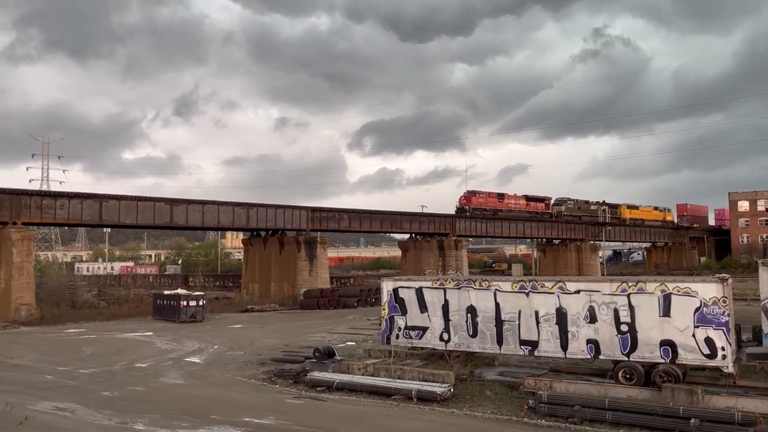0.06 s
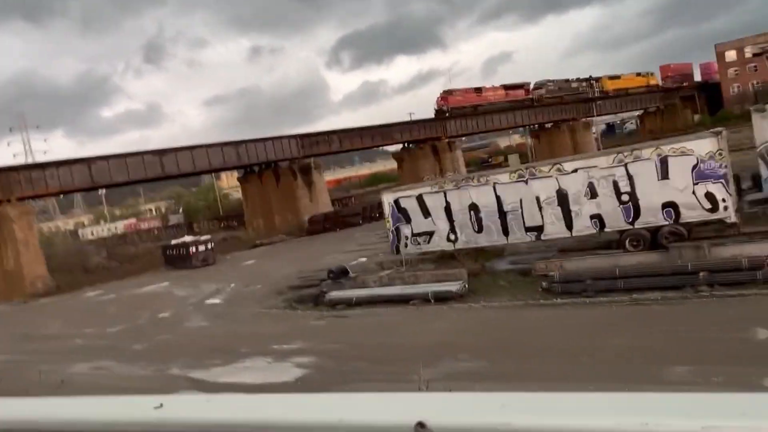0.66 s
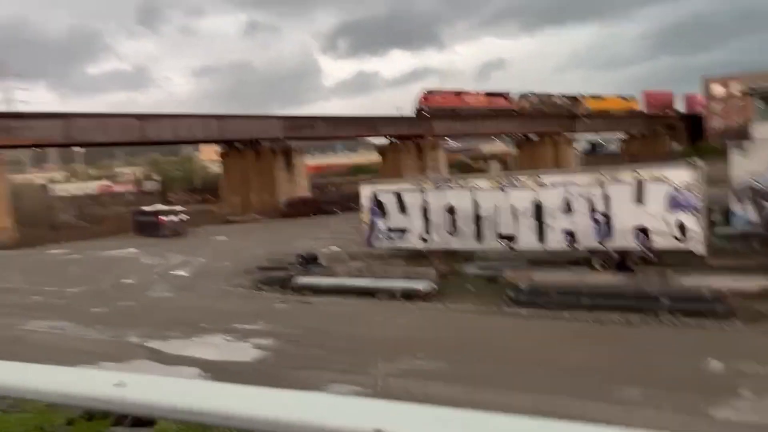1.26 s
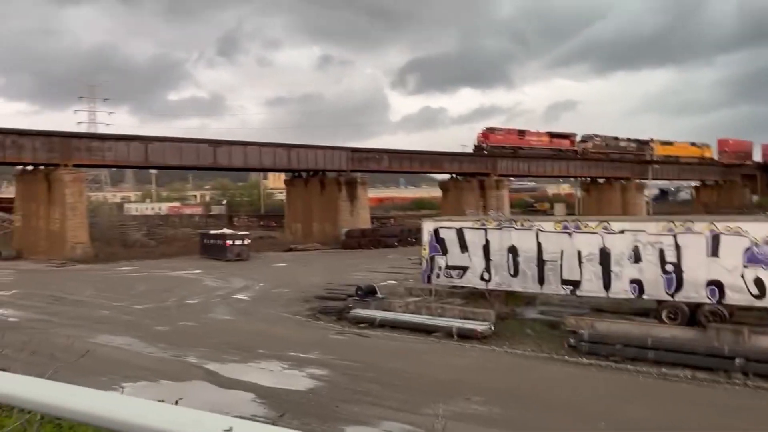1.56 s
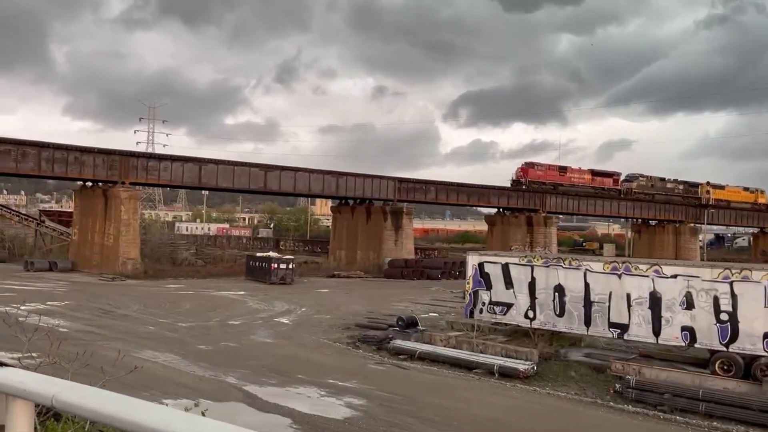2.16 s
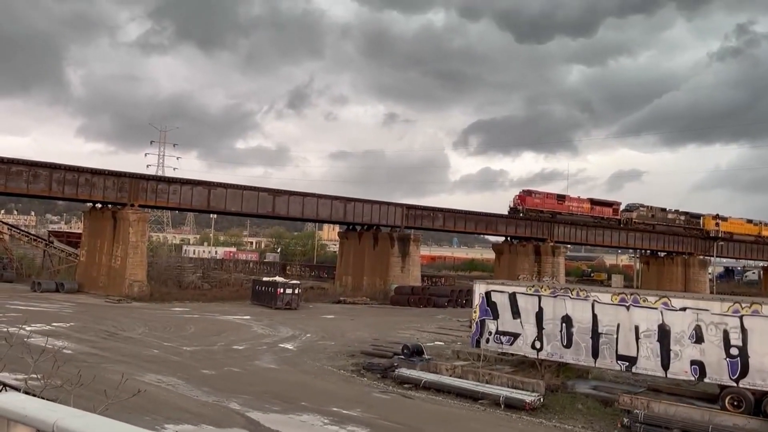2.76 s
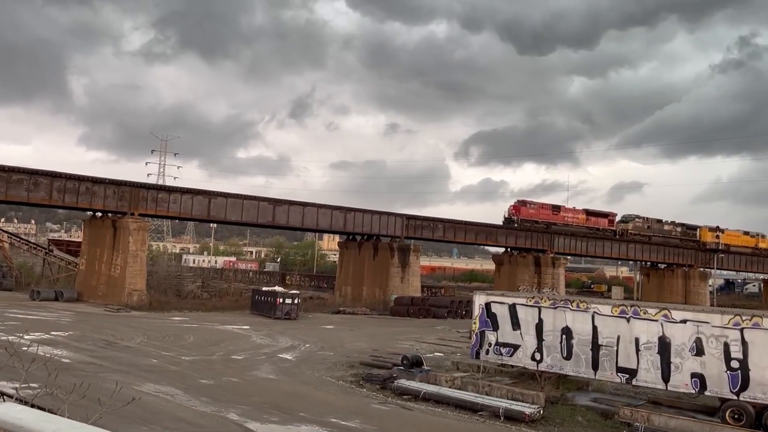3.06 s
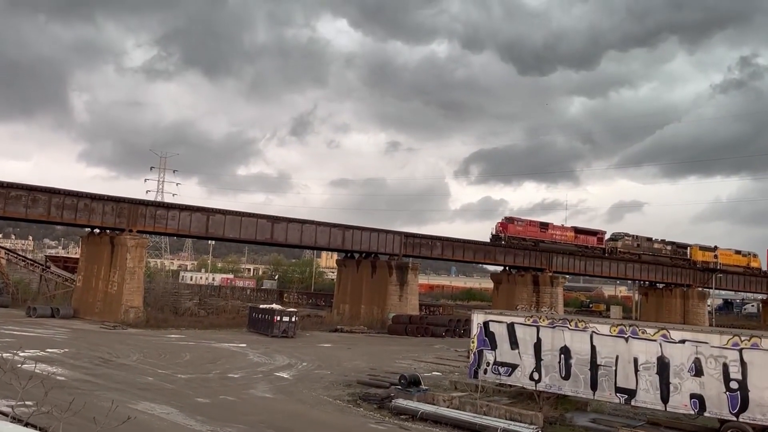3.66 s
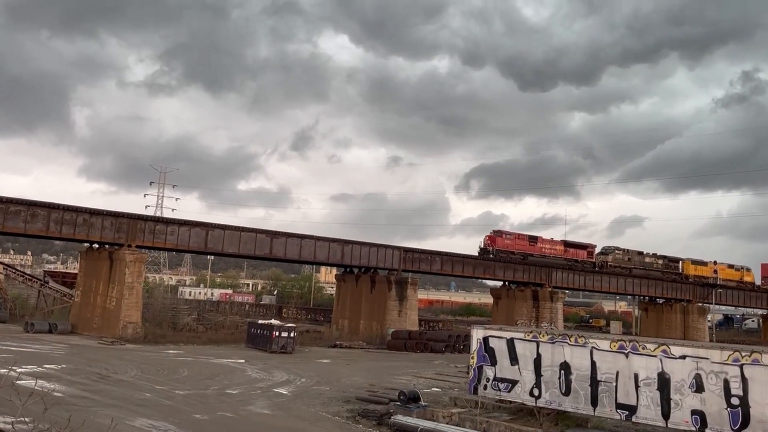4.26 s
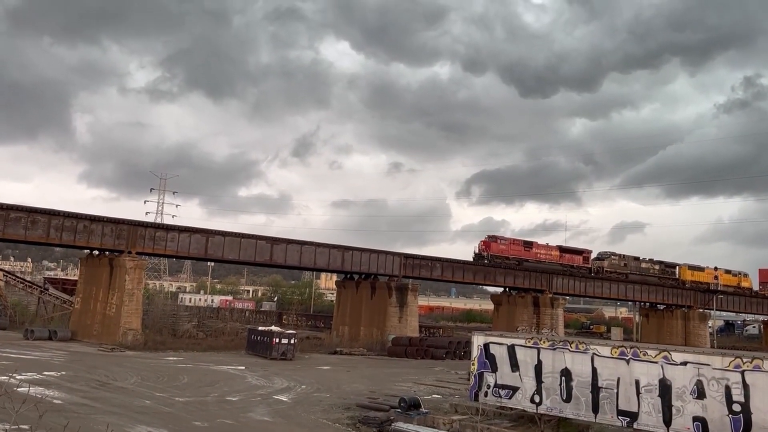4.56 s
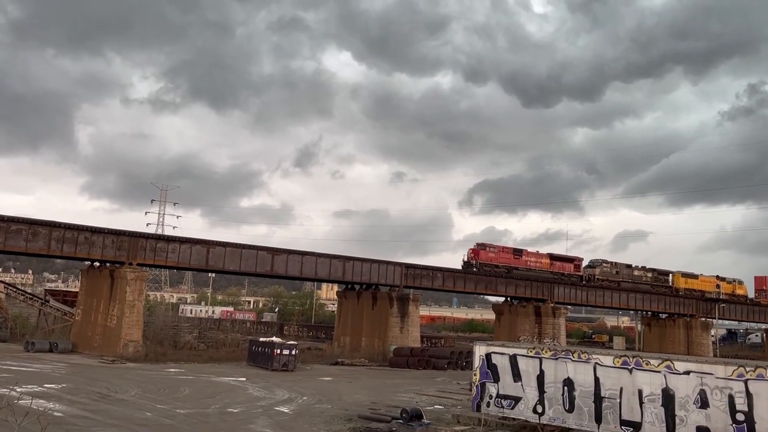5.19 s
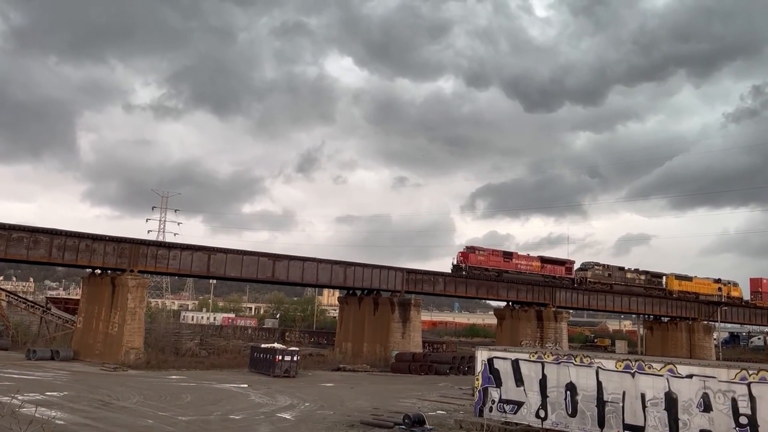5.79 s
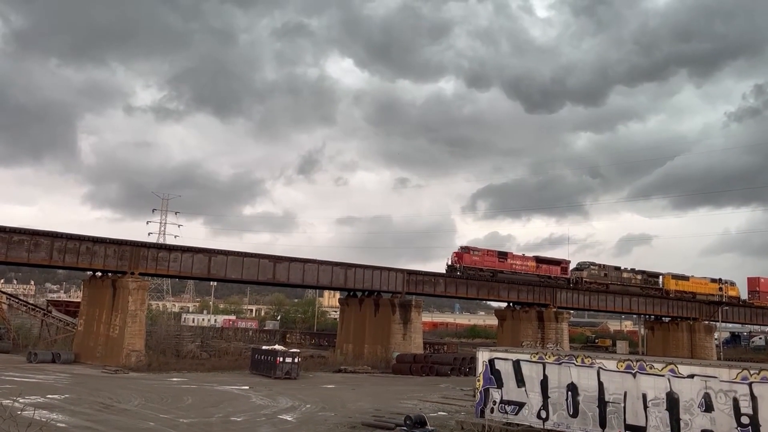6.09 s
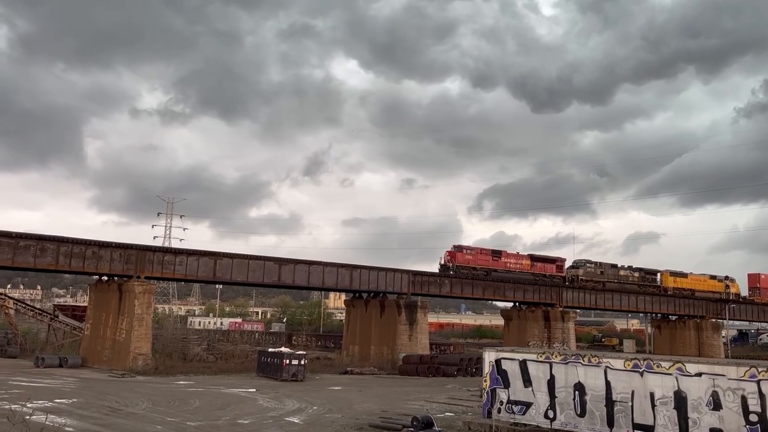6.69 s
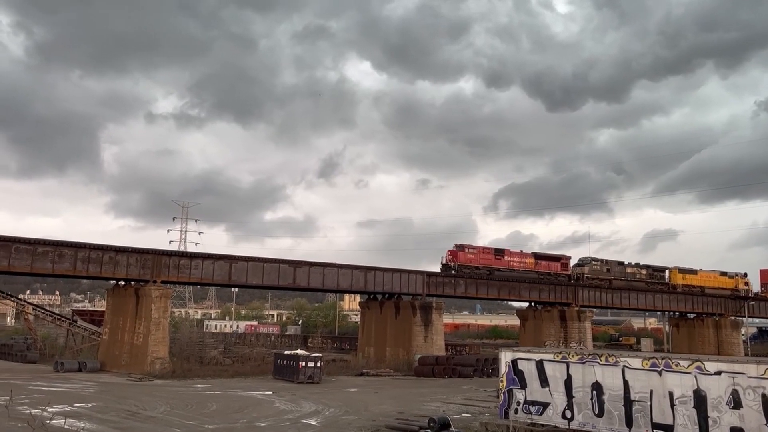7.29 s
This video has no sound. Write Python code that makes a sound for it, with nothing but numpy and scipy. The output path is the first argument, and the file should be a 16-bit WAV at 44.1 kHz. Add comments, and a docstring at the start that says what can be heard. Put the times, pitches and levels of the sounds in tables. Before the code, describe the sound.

A diesel freight train rolls slowly over a steel bridge across an open yard, its engines throbbing low under a steady wheel roar with faint thin squeals. It grows slightly louder. From about two seconds in, ragged gusts of wind buffet and thump the microphone. Close by, a camera shutter fires three bursts of three sharp clicks, each with a tiny motor whir, the last burst near the end.

```python
"""Diesel engines throb and wheels roar as a freight train rolls slowly over a steel girder bridge. Across an
open yard, the exhaust tones of its two locomotives beat together; rolling contact sets wheels, rails and
girders ringing, and friction makes the flanges sing thinly. Turbulent gusts buffet the microphone in ragged
bursts. Close by, a reflex camera fires three bursts of three frames: mirror and curtain strike its body, a
spring rings and the motor whines."""
import sys
import numpy as np
from scipy import signal
from scipy.fft import rfft, irfft, next_fast_len
from scipy.io import wavfile
from scipy.ndimage import uniform_filter1d

SR = 44100
rng = np.random.default_rng(int(sys.argv[2]) if len(sys.argv) > 2 else 0)


def materialize(psi):
    """Save the field psi as 16-bit PCM at rate SR to the path in sys.argv[1].

    A 1-D psi becomes a single channel; in a 2-D psi each row is a channel.
    """
    bounded = np.clip(np.atleast_2d(psi).T, -1, 1)
    quanta = np.round(bounded * 32767).astype(np.int16)
    wavfile.write(sys.argv[1], SR, quanta)


N = 328104
TIME = np.arange(N) / SR

# The train draws nearer. Each row: time in seconds, roar in dB, hiss in dB.
TRAIN_LEVELS = [(0.0, -43.5, -49.5), (0.45, -42.5, -50.5), (0.85, -41.5, -49), (1.3, -40.5, -48),
                (1.88, -39.5, -43.5), (2.9, -40.5, -44.5), (3.1, -37.5, -44), (3.58, -37.5, -44),
                (4.3, -39, -44), (6.38, -38, -41.5), (6.85, -37, -38), (7.44, -37.5, -42.5)]
# Buffets of wind. Each row: time of the peak in seconds, rush in dB, thump in dB, width in seconds.
WIND_BUFFETS = [(0.035, -35, -22, 0.02), (0.201, -31, -27, 0.0058), (0.848, -33, -29, .009),
                (0.865, -31, -34, 0.032), (1.236, -35.5, -30, 0.0064), (1.26, -35, -25, 0.0097),
                (1.348, -25.5, -29, 0.018), (1.62, -36, -29, 0.015), (1.974, -29.5, -33, 0.018),
                (2.1, -29.5, -30, 0.025), (2.277, -42, -21, 0.037), (2.407, -21, -34, 0.03),
                (2.439, -25, -19, 0.007), (2.557, -22.5, -20, 0.014), (2.683, -30, -16, 0.0066),
                (2.772, -33.5, -27, 0.0024), (2.884, -35, -22.5, 0.01), (3.108, -29, -18, 0.0087),
                (3.171, -25.5, -27, 0.017), (3.346, -24.5, -30, 0.011), (3.38, -34, -18.5, 0.011),
                (3.48, -22.5, -22, 0.011), (3.485, -27, -22, .01), (3.564, -23.5, -18, 0.0093),
                (3.622, -21.5, -22, 0.014), (3.66, -23.5, -41, 0.014), (3.749, -23.5, -35, 0.017),
                (3.797, -27.5, -20, 0.0079), (3.887, -22.5, -22, 0.013), (3.929, -24.5, -24, 0.018),
                (3.959, -22, -32, 0.008), (3.978, -29, -18.5, .01), (4.05, -42, -27, 0.012),
                (4.262, -27.5, -26, 0.0062), (4.346, -27.5, -23, 0.0076), (4.713, -26, -25, 0.015),
                (4.839, -27.5, -26, 0.019), (4.913, -35, -18.5, 0.0086), (5.007, -27, -17, 0.0085),
                (5.045, -24, -28, 0.012), (5.073, -24, -22, 0.0061), (5.185, -25.5, -19, 0.0071),
                (5.272, -28, -16, 0.011), (5.34, -28.5, -16, 0.0052), (5.414, -29.5, -23.5, 0.026),
                (5.577, -27, -21.5, 0.021), (5.702, -30, -21, 0.012), (5.888, -36, -18.5, 0.005),
                (6.396, -25, -24, 0.012), (6.505, -41, -20, 0.028), (6.564, -27.5, -23, 0.028),
                (6.677, -29.5, -24, 0.028), (6.855, -26.5, -38, 0.016), (7.049, -22, -17, 0.013),
                (7.067, -39, -18, 0.0065), (7.171, -17.5, -17, 0.02), (7.227, -26.5, -19, 0.006),
                (7.33, -28.5, -14, 0.0072), (7.362, -36.5, -16, 0.014)]
# Likeness of the wind's two channels. Each row: frequency in Hz, correlation from -1 to 1.
WIND_CORRELATION = [(50, 0.69), (90, 0.93), (150, 0.58), (400, 0.73), (1000, 0.38)]
# Balance of the wind. Each row: frequency in Hz, left over right in dB.
WIND_PAN = [(60, 0.3), (600, -2)]
# Camera modes excited by the mirror. Each row: frequency in Hz, bandwidth in Hz, gain in dB.
BODY_MODES = [(1960, 570, 5), (3064, 260, 8), (3740, 470, 4.5), (5090, 530, 9.5), (6200, 650, 4.5),
              (7060, 480, 1.5), (8430, 700, 0)]


def rolling_noise(roar_db=7.5, hiss_db=2.0, girder_db=0.5, ring_db=-1.2, waver_db=1.12):
    """Forced vibration: girders roar, wheels and rails hiss, and the air makes both waver; modes ring."""
    # In both spectra, each row: frequency in Hz, spectral density in dB.
    roar_spectrum = [(40, 6.5), (70, 9), (140, 8), (220, -14), (380, -1.5), (700, 1.5), (1000, 2.5),
                     (1400, 5), (1900, -1.5), (2500, -10), (3300, -41), (6000, -64)]
    hiss_spectrum = [(1200, -7.5), (2400, 9.5), (3100, 8.5), (3600, 3), (4400, 2.5), (5300, -1),
                     (6200, -1.5), (7000, -3.5), (8000, -9), (8800, -18.5), (9700, -71), (10500, -33),
                     (11400, -17.5), (13200, -29), (14800, -49)]
    # Each row: frequency in Hz, correlation of the channels.
    correlation = [(60, 0.94), (250, 0.99), (550, -0.015), (880, 0.037), (1350, -0.74), (1750, -0.37),
                   (2250, 0.23), (3200, 0.11), (3500, -0.071), (4100, 0.4), (5100, 0.84), (5650, -0.23),
                   (6450, -0.49), (6900, 0.5), (7900, 0.57), (8700, -0.29)]
    # Each row: frequency in Hz, left over right in dB.
    balance = [(800, 2), (1300, 3), (1800, 4.5), (2600, 2.5), (3800, -7.5), (5500, 0), (7500, 0.5)]
    # In both sets, each row: frequency in Hz, bandwidth in Hz, gain in dB, left over right in dB.
    girder_modes = [(967, 88, -9, -4), (1128, 78, -20.5, 1), (1327, 64, -11.5, 0), (1521, 116, -11, 4),
                    (1867, 99, -16, 4), (2044, 150, -11.5, 1.5)]
    wheel_modes = [(3218, 310, -8.5, 7), (3950, 420, -10.5, -10.5), (4700, 97, -8, -4.5),
                   (5225, 340, -12, -5.5)]
    roar, hiss = in_time(TRAIN_LEVELS)
    out = from_db(roar + roar_db + waver_db * drift(3.6)) * noise(roar_spectrum, correlation, balance)
    out += from_db(hiss + hiss_db + waver_db * drift(29)) * noise(hiss_spectrum, correlation, balance)
    out += from_db(roar + girder_db) * steel_ringing(girder_modes, flicker_db=4.0, alike=-0.5)
    return out + from_db(hiss + ring_db) * steel_ringing(wheel_modes, flicker_db=2.5, alike=0.18)


def steel_ringing(modes, flicker_db, alike):
    """Modal superposition: rubbed steel rings in modes that fade in and out independently."""
    return sum(from_db(db + flicker_db * drift(19.0)) * rubbed_mode(hz, width_hz, alike) * pan(pan_db)
               for hz, width_hz, db, pan_db in modes)


def rubbed_mode(hz, width_hz, alike):
    """Resonance narrows random friction to a restless stereo tone of unit rms."""
    mid, side = rng.standard_normal((2, N))
    rub = np.sqrt(1 + alike) * mid + np.sqrt(1 - alike) * side * [[1], [-1]]
    return rms_one(resonate(resonate(rub, hz, width_hz), hz, width_hz))


def engine_rumble(cycles_per_s=6.5, throb_db=3.0, wander=0.0097, air_db=-1.0):
    """Beats: exhaust tones of engines at unequal speeds throb over deep noise that thumps in buffets."""
    # Engines and moving air. Each row: time in seconds, level in dB.
    rumble_levels = [(0.0, -29.5), (0.33, -37), (0.88, -30), (2.2, -41), (2.28, -26), (2.96, -28.5),
                     (3.42, -21), (4.65, -33), (5.08, -25.5), (6.86, -25), (7.09, -22), (7.44, -31.5)]
    # Each row: frequency in Hz, level in dB relative to the rumble.
    exhaust_tones = [(66, -2), (68.3, -6.5), (72.5, -10), (86, -7)]
    # Each row: frequency in Hz, spectral density in dB.
    deep_spectrum = [(18, -28), (30, -14), (40, -19), (50, -0.5), (66, -5), (85, -2), (120, -8.5),
                     (170, -13.5), (280, -23.5), (450, -37)]
    level = in_time(rumble_levels)[0] - 1.47
    thumps = [(s, thump_db, width_s) for s, _, thump_db, width_s in WIND_BUFFETS]
    air = evened(noise(deep_spectrum, WIND_CORRELATION, WIND_PAN), window_s=0.032)
    out = with_swells(level + air_db, thumps) * air
    throb = throb_db * wandering_sine(cycles_per_s, wander, rate=2)   # one swell per engine cycle
    for hz, db in exhaust_tones:
        tone = wandering_sine(hz, wander, rate=2.24)
        out += from_db(level + db + throb + drift(3.9)) * tone
    return out


def flange_squeal(rub_db=-12.5, waver_db=1.94):
    """Friction drives a high wheel mode, which sings out when the flange leans on the rail."""
    # Each row: time of the peak in seconds, level in dB, width in seconds.
    squeals = [(1.0, -57.5, .35), (1.96, -50, 0.095), (2.35, -49.5, 0.12), (4.35, -51, 0.045),
               (5.53, -46, 0.089), (5.878, -44, 0.14), (6.6, -50.5, 0.45), (7.35, -50.5, 0.15)]
    _, hiss = in_time(TRAIN_LEVELS)
    tone = rubbed_mode(hz=7270, width_hz=148, alike=0.87) * pan(2.4)
    return with_swells(hiss + rub_db, squeals) * from_db(waver_db * drift(14.0)) * tone


def wheel_squeaks(air_cut_hz=8200):
    """Sliding friction rings a wheel as it briefly slips; air absorption dulls the top."""
    # Each row: peak time in seconds, frequency in Hz, bandwidth in Hz, level in dB, width in seconds.
    slips = [(0.42, 1297, 70, -49, 0.18), (0.8, 1195, 80, -44.5, 0.26), (1.12, 1303, 80, -45, 0.35),
             (1.41, 2080, 150, -43, 0.066), (1.543, 4700, 3400, -48.5, 0.066),
             (1.817, 3850, 1490, -41, 0.011), (1.958, 4370, 1390, -42.5, 0.027),
             (1.97, 3200, 300, -45, 0.032), (4.277, 3140, 200, -43, 0.016), (4.633, 4300, 1100, -43, .022),
             (5.885, 2280, 480, -36, 0.033), (5.97, 3830, 900, -38, 0.016), (6.243, 4900, 200, -43, 0.017)]
    out = sum(from_db(db) * swell(s, width_s) * rubbed_mode(hz, width_hz, alike=0.25)
              for s, hz, width_hz, db, width_s in slips)
    return low_pass(out, air_cut_hz, order=6)


def camera():
    """Impact excitation: in each frame the mirror lifts, the curtain snaps, the mirror drops and bounces."""
    # Each row: time of the mirror's return in seconds, mirror and motor gain in dB, curtain gain in dB.
    frames = [(3.2888, -4, -3), (3.6041, -5, -4.5), (3.9203, -4, -1.5), (4.921, -3, -2), (5.2375, -3.5, -5),
              (5.5527, -3, -2.5), (6.559, -2.5, -1), (6.878, -2, -2), (7.1939, -1, 2.5)]
    # In both sets of contacts, each row: seconds from the return, level in dB, decay in seconds.
    mirror_hits = [(-.136, -27, 0.003), (-.126, -25, 0.0041), (-.1165, -22.5, 0.0033), (0, -13, .0027),
                   (.0115, -15.5, 0.0022), (.022, -29.5, .004)]
    curtain_hits = [(-.0508, -13.5, 0.0017)]
    # Each row: frequency in Hz, bandwidth in Hz, gain in dB.
    curtain_modes = [(3120, 450, -0.5), (4720, 270, 4), (5600, 500, 13), (6940, 450, -8)]
    t = np.arange(-SR // 5, SR // 8) / SR   # zero at the mirror's return
    out = np.zeros((2, N))
    for s, mirror_db, curtain_db in frames:
        mirror = impacts(mirror_hits, t) * camera_body(BODY_MODES, len(t), crisp_db=-16)
        curtain = impacts(curtain_hits, t) * camera_body(curtain_modes, len(t), crisp_db=-19)
        mechanism = mirror + spring(t) + motor(t)
        add(out, from_db(mirror_db) * mechanism + from_db(curtain_db) * curtain, s + t[0])
    return out * pan(-0.5)


def impacts(hits, t, tail_db=-22, tail_s=0.024, rise_s=0.00084):
    """Damping: the envelope of each contact decays exponentially, with a tail of rattling springs."""
    power = 0
    for s, db, decay_s in hits:
        age = np.maximum(t - s, 0)
        attack = 1 - np.exp(-age / rise_s)
        decay = np.exp(-age / decay_s) + from_db(tail_db) * np.exp(-age / tail_s)
        power += (from_db(db + rng.normal(0, 0.7)) * attack * decay) ** 2
    return np.sqrt(power)


def camera_body(modes, size, crisp_db, dull_hz=7600, crisp_hz=8500, alike=0.52):
    """Modal response: the body colours a rattle, with a bright crack on top; the level is held at 1."""
    shared, own = rng.standard_normal(size), rng.standard_normal((2, size))
    delayed_pair = np.array([shared, np.roll(shared, 12)])   # the sound reaches the left port first
    rattle = np.sqrt(alike) * delayed_pair + np.sqrt(1 - alike) * own
    # Every blow shares its strength among the modes a little differently.
    body = sum((-1) ** k * from_db(db + rng.normal(0, 1.0)) * resonate(rattle, hz, width_hz)
               for k, (hz, width_hz, db) in enumerate(modes))
    crack = from_db(crisp_db) * low_pass(rattle, crisp_hz, order=2)
    return evened(rms_one(low_pass(body, dull_hz, order=8) + crack), window_s=0.0028)


def motor(t, attack_s=0.0049, release_s=0.0029, gear_release_s=0.033, judder_hz=700, chatter_db=1.5):
    """Modulation: uneven gear load roughens a gliding whine; the gears rattle on after each run."""
    # Three runs: lift the mirror, lower it, rewind. Each row: start in seconds from the return, length
    # in seconds, first and target pitch in Hz, settling time in seconds, whine in dB, rasp in dB,
    # judder as a fraction of the pitch.
    runs = [(-.162, 0.035, 4320, 6830, 0.028, -41.5, -38, .05),
            (-.032, 0.029, 4810, 6160, 0.0047, -43, -38, .016),
            (0.013, 0.037, 4850, 4550, .03, -38, -40.5, .012)]
    out = 0
    for s, length_s, start_hz, end_hz, settle_s, whine_db, rasp_db, judder in runs:
        age = np.maximum(t - s, 0)
        attack = 1 - np.exp(-age / attack_s)
        stopped_s = np.maximum(age - length_s, 0)
        hz = end_hz + (start_hz - end_hz) * np.exp(-age / settle_s)
        load = rms_one(low_pass(rng.standard_normal(len(t)), judder_hz, order=2))
        speed = rng.normal(1, 0.0091) - judder * load
        tone = np.sqrt(2) * np.sin(2 * np.pi * np.cumsum(hz * speed) / SR)
        whine = from_db(whine_db + chatter_db * load + rng.normal(0, 0.97)) * tone
        gears = from_db(rasp_db) * camera_body(BODY_MODES[2:], len(t), crisp_db=-36)
        out += attack * (whine * np.exp(-stopped_s / release_s)
                         + gears * np.exp(-stopped_s / gear_release_s))
    return out


def spring(t, buzz_db=3.0, buzz_hz=250):
    """Free vibration: a spring rings down after the mirror lands, buzzing against its seat."""
    # Each row: frequency in Hz, level in dB, decay in seconds.
    modes = [(3070, -36.5, 0.034), (3250, -36, 0.033), (3696, -37, 0.01)]
    age = np.maximum(t, 0)
    buzz = from_db(buzz_db * rms_one(low_pass(rng.standard_normal(len(t)), buzz_hz, order=2)))
    ring = 0
    for hz, db, decay_s in modes:
        envelope = from_db(db + rng.normal(0, 1.2)) * np.exp(-age / decay_s)
        ring += envelope * np.sin(2 * np.pi * hz * rng.normal(1, 0.0049) * age)
    return buzz * ring


def wind(steady_db=-1.0, gain_db=0.5, lump_db=2.5, flutter_db=2.5, split_hz=400, brighten=0.37):
    """Turbulence reaches the microphone in lumps; its upper band flutters and grows in strong gusts."""
    # Each row: time in seconds, level in dB.
    wind_levels = [(0.0, -29.5), (.14, -47), (.51, -47), (.56, -37.5), (.9, -29.5), (1.07, -38),
                   (1.2, -33.5), (1.45, -41.5), (1.6, -37), (1.9, -36.5), (2.28, -24.5), (2.4, -27),
                   (2.48, -25.5), (2.92, -31.5), (3.02, -22.5), (3.28, -26), (3.38, -22), (3.6, -24.5),
                   (3.7, -28.5), (4.1, -29), (4.58, -34.5), (4.85, -31.5), (5.13, -33.5), (5.5, -29.5),
                   (5.85, -31.5), (6.65, -29), (6.98, -31), (7.12, -26), (7.28, -32), (7.44, -23.5)]
    # Each row: frequency in Hz, spectral density in dB.
    spectrum = [(60, -21.5), (120, 1.5), (180, 0.5), (280, -2), (480, -6.5), (700, -10), (1000, -18.5),
                (1500, -24), (3000, -76)]
    rushes = [(s, rush_db, width_s) for s, rush_db, _, width_s in WIND_BUFFETS]
    level = in_time(wind_levels)[0] + steady_db + lump_db * np.minimum(drift(43.5), 1.5)
    gust_db = 20 * np.log10(with_swells(level, rushes))
    air = noise(spectrum, WIND_CORRELATION, WIND_PAN)
    low = low_pass(air, split_hz, order=1)
    treble_db = flutter_db * np.minimum(drift(110), 1.5) + brighten * (gust_db - gust_db.mean())
    high = (air - low) * from_db(treble_db)
    return from_db(gust_db + gain_db) * evened(low + high, window_s=0.026)


def eddies(gain_db=-3.0, rise_s=0.0021):
    """Pressure pulses: each hard eddy hits the microphone ports with a brief, dull knock."""
    # Each row: start in seconds, level in dB.
    arrivals = [(.835, -22), (1.115, -27), (1.34, -23), (1.62, -28), (2.189, -25), (2.4, -19), (2.43, -15),
                (2.545, -14.5), (2.657, -19.5), (2.7, -17), (2.785, -15), (2.865, -23), (2.95, -24),
                (2.987, -18.5), (3.01, -14.5), (3.028, -12), (3.045, -13), (3.093, -20), (3.346, -13.5),
                (3.394, -18), (3.468, -17), (3.554, -13), (3.608, -15), (3.717, -18), (3.788, -18.5),
                (3.861, -20), (3.912, -13), (4.25, -25), (4.334, -21.5), (4.748, -22), (4.815, -24),
                (4.848, -23), (4.908, -26), (5.018, -17), (5.045, -15), (5.265, -16), (5.338, -21),
                (5.557, -27), (6.083, -17.5), (6.624, -22), (6.664, -16), (7.02, -21), (7.064, -17),
                (7.122, -16.5), (7.151, -9.5), (7.228, -21), (7.345, -13), (7.409, -23)]
    # Each row: frequency in Hz, spectral density in dB.
    spectrum = [(80, -8), (200, -5.5), (400, 2.5), (680, 0.5), (1000, -17.5), (2000, -52)]
    knocks = np.zeros(N)
    age_in_rises = np.arange(SR // 10) / SR / rise_s
    pulse = age_in_rises * np.exp(1 - age_in_rises)
    for s, db in arrivals:
        add(knocks, from_db(db + gain_db) * pulse, s)
    return knocks * evened(noise(spectrum, WIND_CORRELATION, WIND_PAN), window_s=0.0033)


def noise(spectrum, correlation, balance):
    """Spectral shaping: stereo noise of given colour, correlation and balance, at unit rms."""
    size = next_fast_len(N, True)
    hz = np.arange(size // 2 + 1) * SR / size
    mid, side = rfft(rng.standard_normal((2, size))) * from_db(at_hz(spectrum, hz))
    alike, ears = np.clip(at_hz(correlation, hz), -1, 1), np.array([[1], [-1]])
    roll_off = 1 / (1 + (hz / (2 * spectrum[-1][0])) ** 4)
    stereo = np.sqrt(1 + alike) * mid + np.sqrt(1 - alike) * side * ears
    return rms_one(irfft(roll_off * stereo * from_db(at_hz(balance, hz) * ears / 2), size)[:, :N])


def drift(rate):
    """Smooth random fluctuation of unit rms that changes about rate times a second."""
    step, run_in = 40, 2000
    pole = np.exp(-2 * np.pi * step * rate / SR)
    white = rng.standard_normal(N // step + run_in + 2)
    slow = signal.lfilter([1], [1, -2 * pole, pole * pole], white)[run_in:]
    return np.interp(np.arange(N) / step, np.arange(len(slow)), rms_one(slow))


def wandering_sine(hz, wander, rate):
    """Frequency modulation: a sine strays at random by the fraction wander."""
    phase = 2 * np.pi * np.cumsum(hz * (1 + wander * drift(rate))) / SR
    return np.sin(phase + rng.uniform(0, 2 * np.pi))


def swell(s, width_s):
    """Gaussian envelope of height 1 around time s."""
    return np.exp(-np.minimum(((TIME - s) / width_s) ** 2 / 2, 50))


def with_swells(steady_db, swells):
    """Incoherent addition: the gain of a steady level and its swells, summed in power."""
    swell_power = sum((from_db(db) * swell(s, width_s)) ** 2 for s, db, width_s in swells)
    return np.sqrt(from_db(steady_db) ** 2 + swell_power)


def evened(x, window_s):
    """Hold the short-term rms of a noise at 1."""
    size = int(window_s * SR)
    power = uniform_filter1d(uniform_filter1d(np.mean(x ** 2, axis=0), size), size)
    return x / np.sqrt(np.abs(power) + 1e-9)


def resonate(x, hz, width_hz):
    """Two-pole resonance with a peak gain of 1."""
    r = np.exp(-np.pi * width_hz / SR)
    feedback = [1, -2 * r * np.cos(2 * np.pi * hz / SR), r * r]
    return signal.lfilter(np.array([1, 0, -1]) * (1 - r * r) / 2, feedback, x)


def low_pass(x, hz, order):
    """Maximally flat low-pass."""
    return signal.sosfilt(signal.butter(order, hz, fs=SR, output="sos"), x)


def in_time(rows):
    """Interpolate each column of a time curve at every sample."""
    s, *columns = np.transpose(rows)
    return [np.interp(TIME, s, column) for column in columns]


def at_hz(points, hz):
    """Interpolate on a log-frequency axis."""
    f, value = np.transpose(points)
    return np.interp(np.log(hz + 1e-3), np.log(f), value)


def from_db(db):
    """Decibels to gain."""
    return 10 ** (np.asarray(db) / 20)


def rms_one(x):
    """Scale to unit rms."""
    return x / np.sqrt(np.mean(x ** 2) + 1e-20)


def pan(db):
    """Left and right gains for a level difference."""
    return from_db([[db / 2], [-db / 2]])


def add(out, sound, s):
    """Mix a sound in at time s."""
    start = int(round(s * SR))
    part = sound[..., :N - start]
    out[..., start:start + part.shape[-1]] += part


def scene():
    """Superposition of the distant train, the wind at the microphone and the camera close by."""
    train = rolling_noise() + flange_squeal() + wheel_squeaks() + engine_rumble()
    return train + wind() + eddies() + camera()


def record(dry, low_cut_hz=33, stopband_hz=16800):
    """Band limiting: the recorder cuts the deepest bass and the top."""
    thinned = signal.sosfilt(signal.butter(4, low_cut_hz, "high", fs=SR, output="sos"), dry)
    return signal.sosfilt(signal.cheby2(12, 70, stopband_hz, fs=SR, output="sos"), thinned)


dry = scene()
out = record(dry)
materialize(out)
```